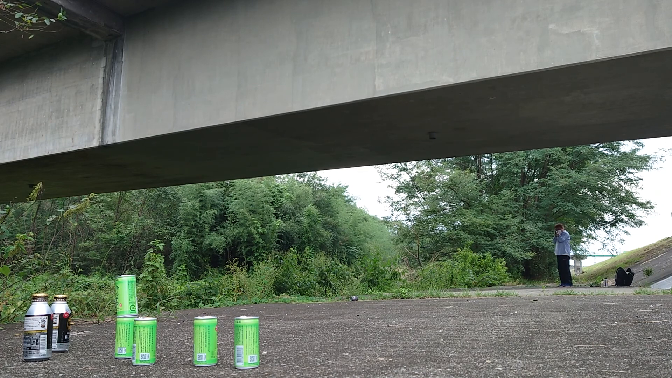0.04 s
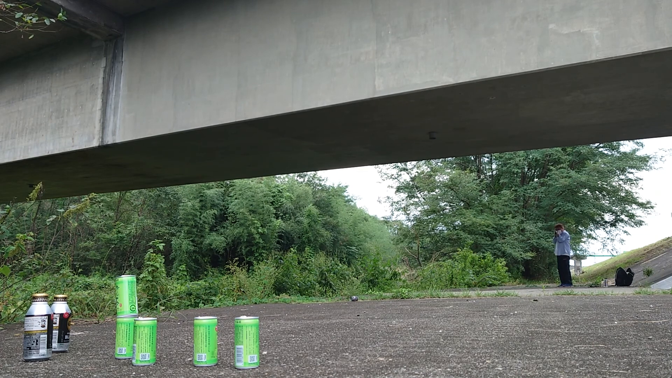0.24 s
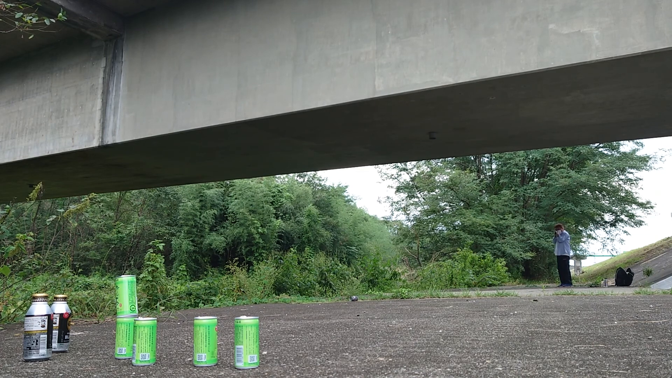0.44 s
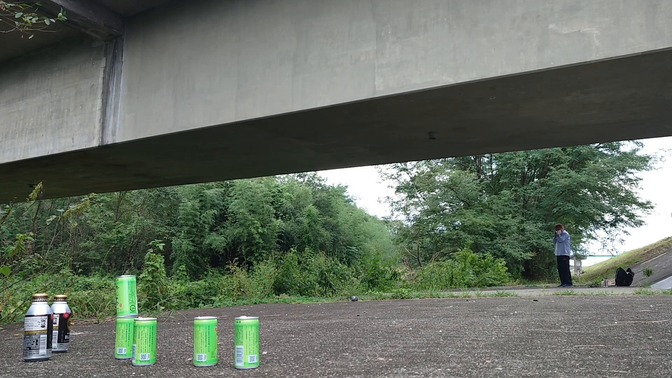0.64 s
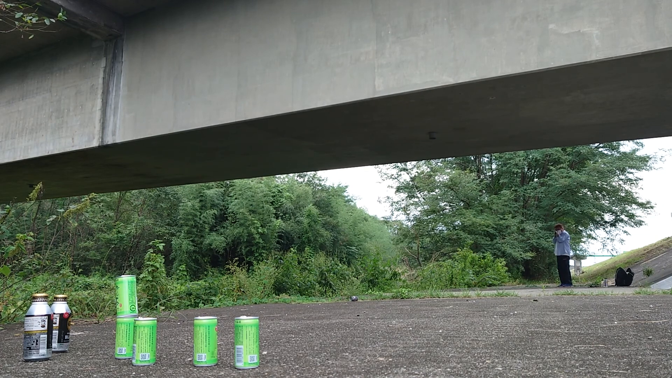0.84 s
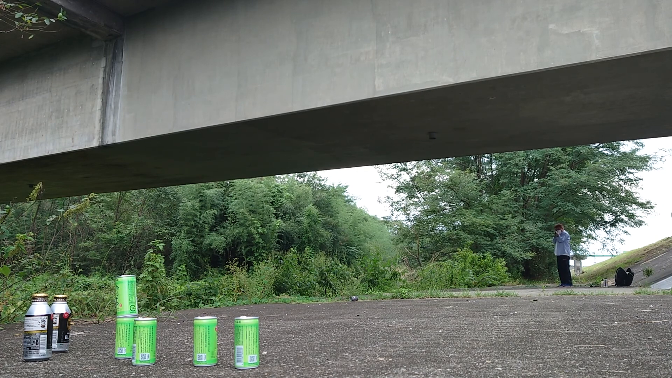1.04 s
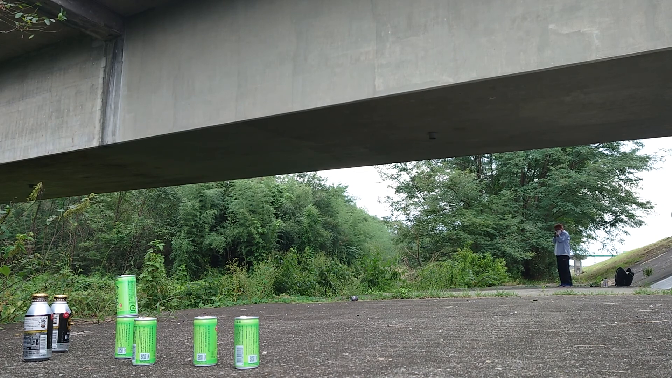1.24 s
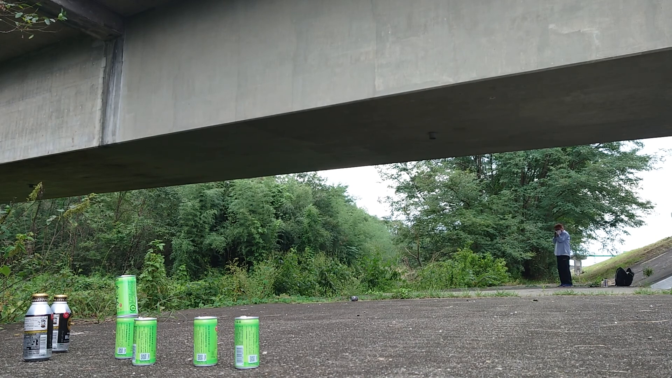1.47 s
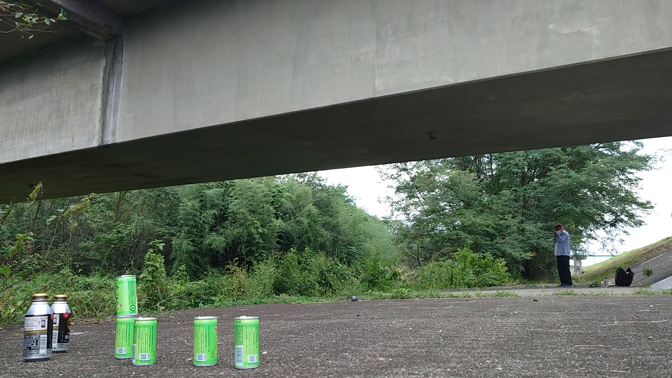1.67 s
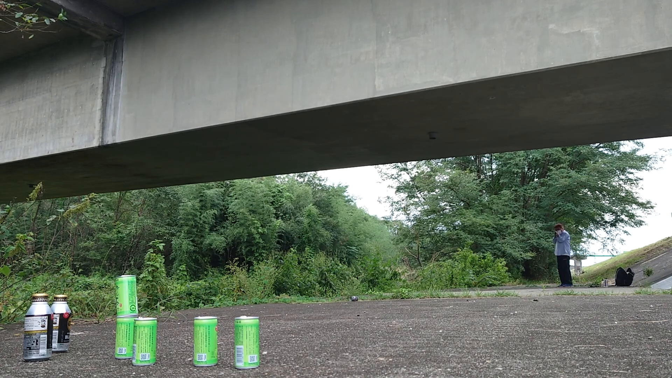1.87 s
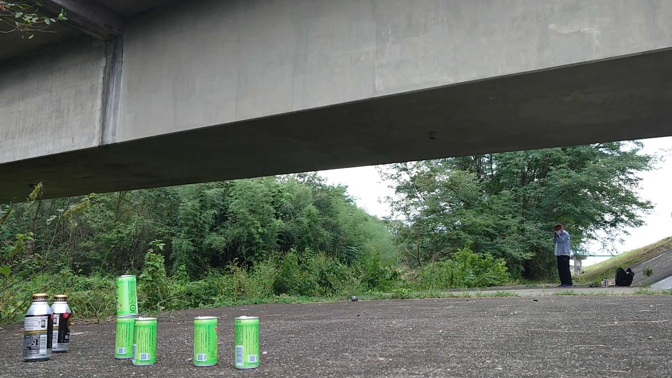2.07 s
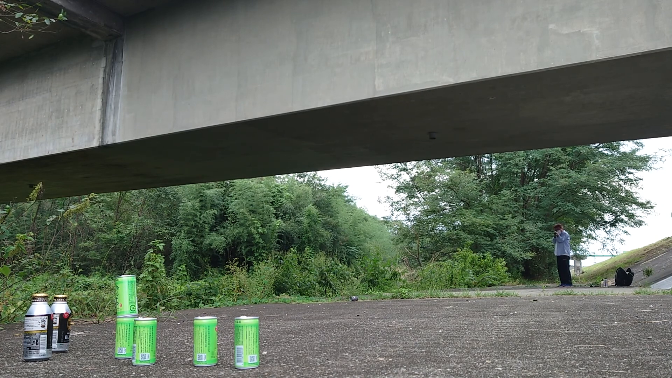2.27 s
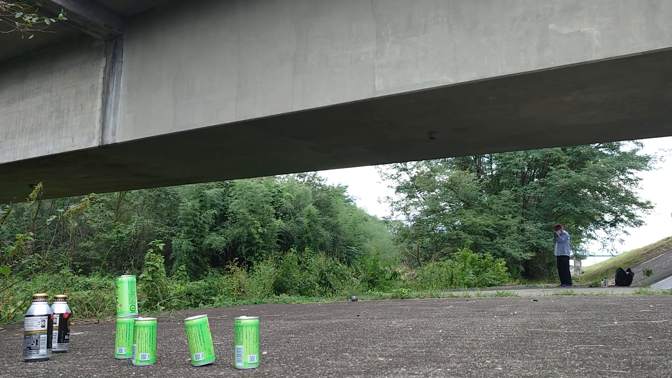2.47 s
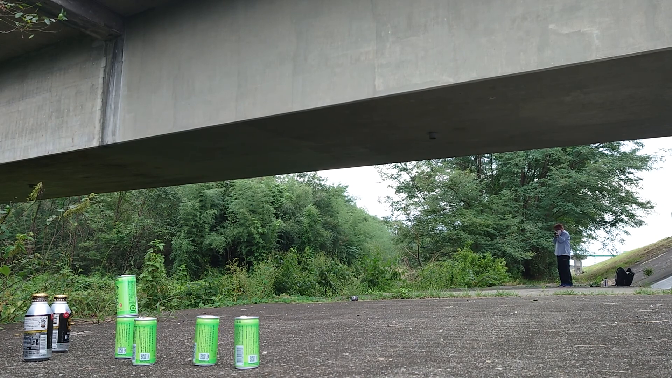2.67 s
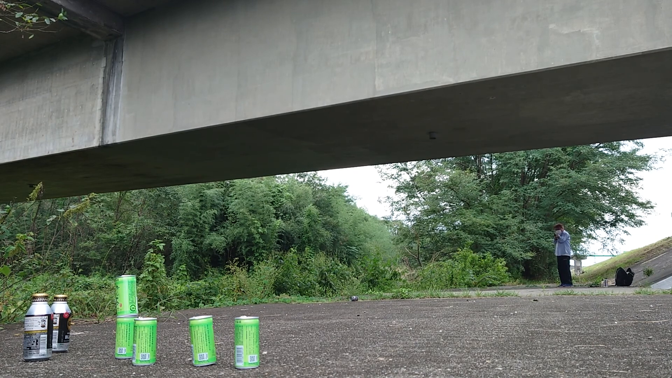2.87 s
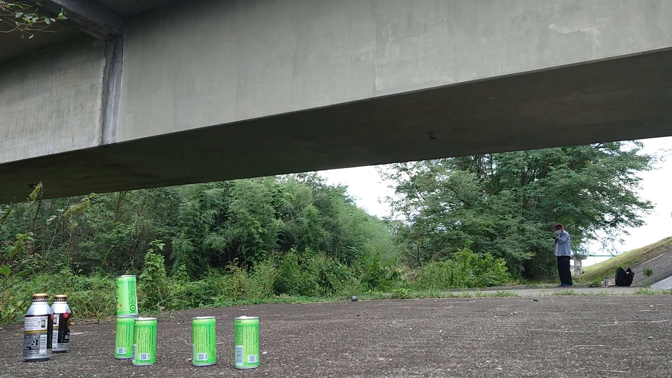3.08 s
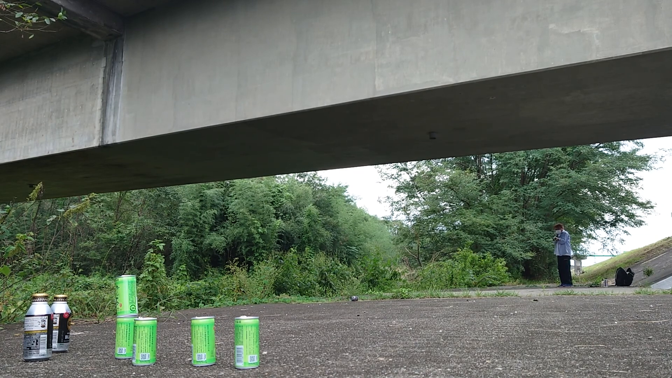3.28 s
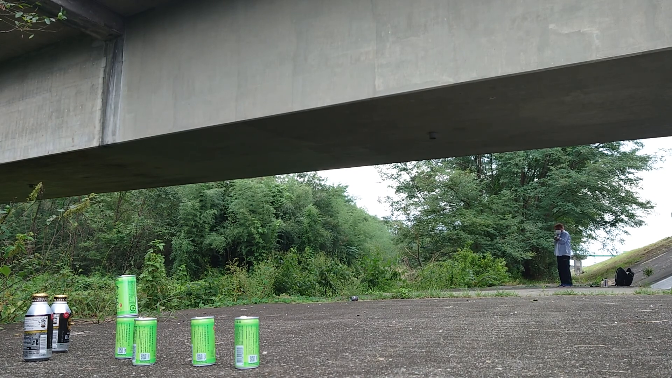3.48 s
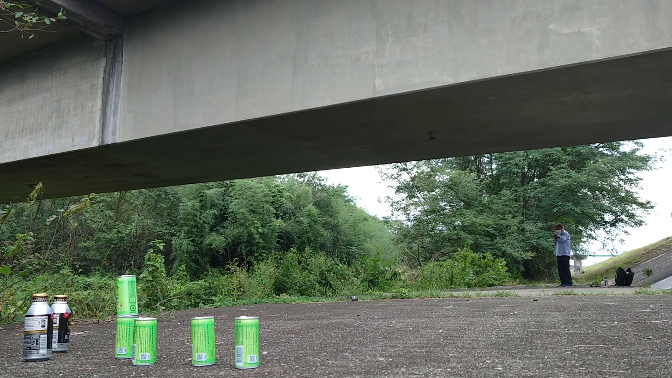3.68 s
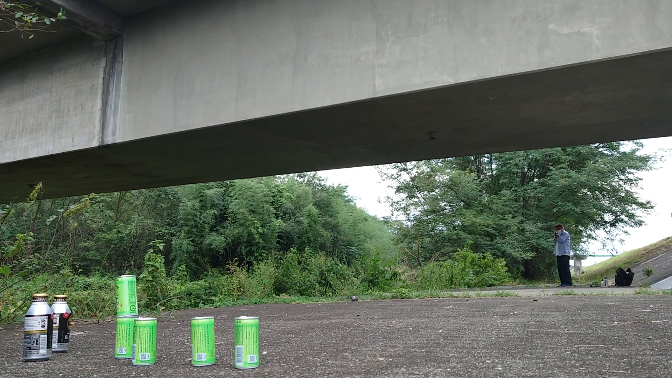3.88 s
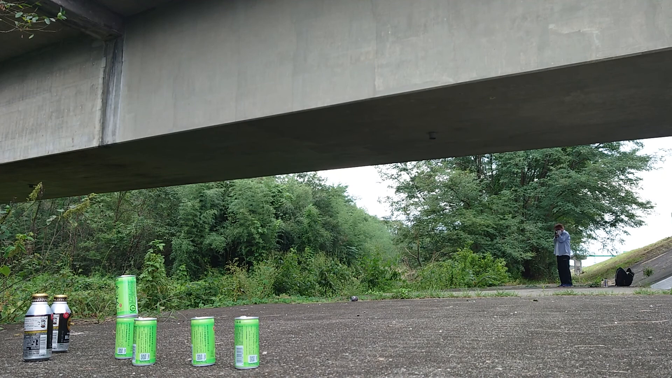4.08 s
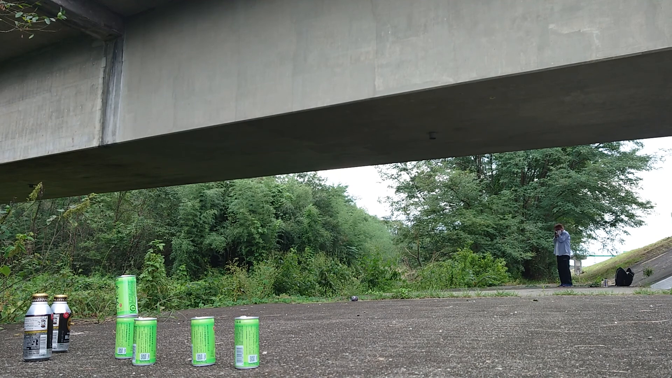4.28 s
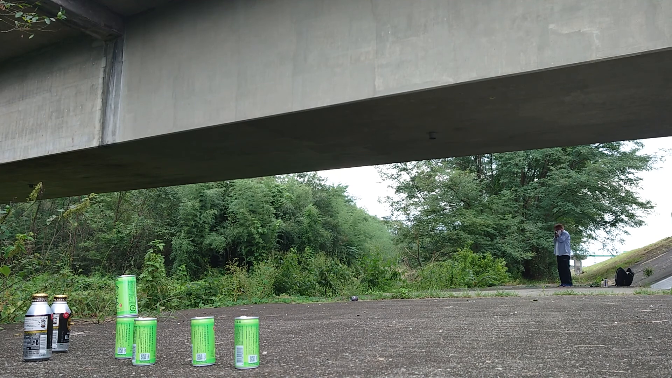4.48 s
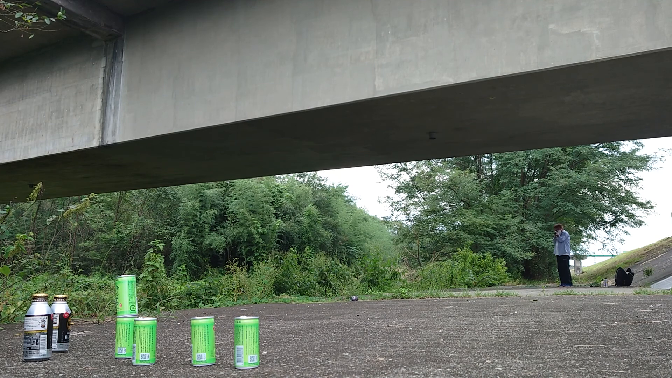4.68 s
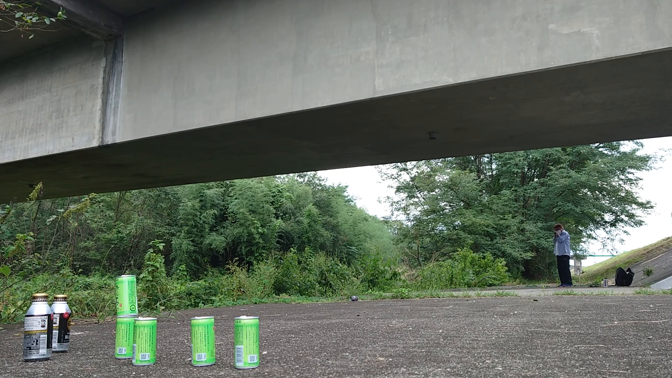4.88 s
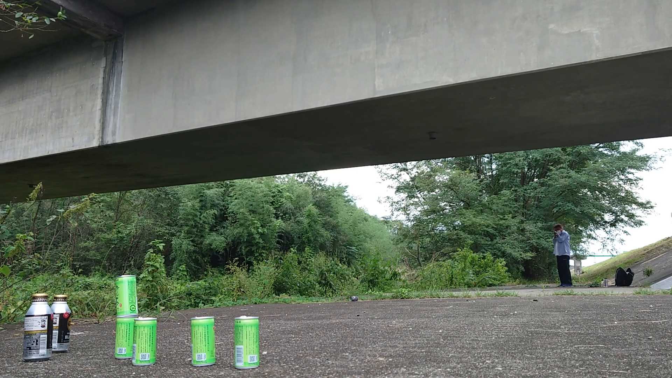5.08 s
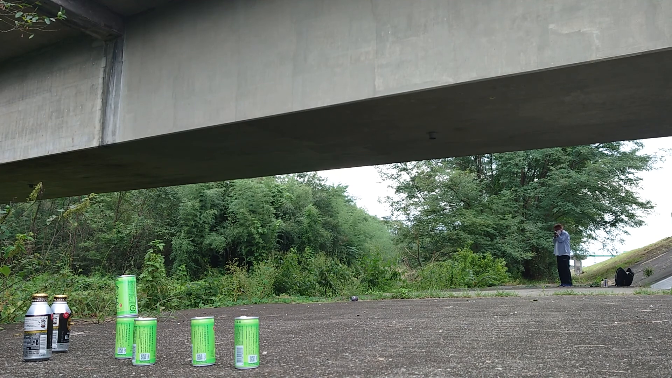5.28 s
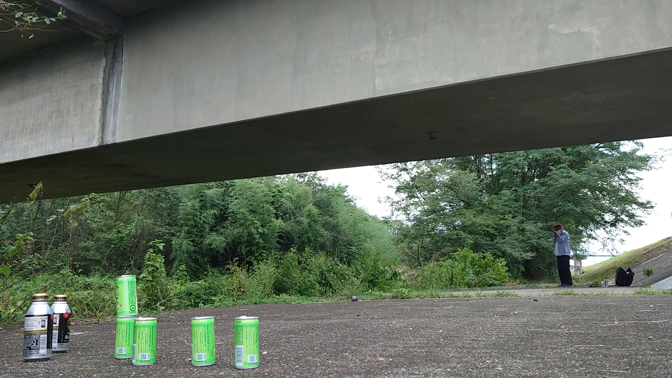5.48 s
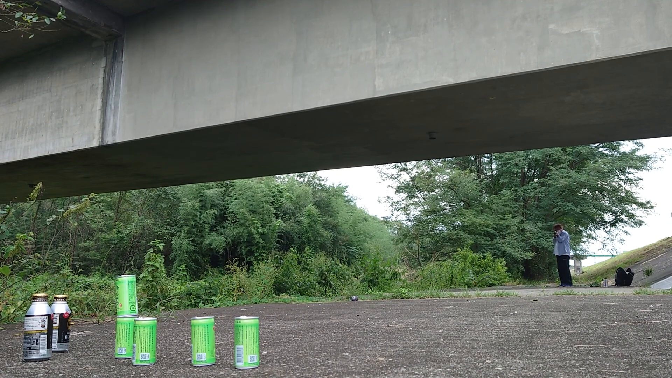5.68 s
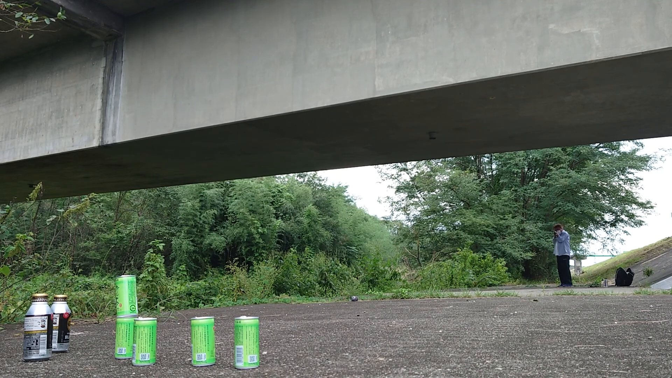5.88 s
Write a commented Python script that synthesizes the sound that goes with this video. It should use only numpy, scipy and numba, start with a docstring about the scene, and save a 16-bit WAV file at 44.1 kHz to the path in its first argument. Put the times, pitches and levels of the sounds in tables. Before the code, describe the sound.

Outdoors under a concrete bridge, low traffic drones with uneven booming swells and faint bird chirps. A short hollow pop is followed almost at once by a loud, bright smack on an empty aluminium can close to the microphones. It rings, drops onto asphalt and rocks with quickening, duller knocks. Dry ticks crackle at right; a softer pop follows, then sparse ticks and chirps.

```python
"""Traffic drones over a concrete bridge and birds chirp; dry ticks begin to crackle, far to the right.
An air gun pops some way off: a brief air pulse rings its barrel and body. The pellet then strikes an empty
drink can, whose modes ring; it tips, lands and rocks to rest on asphalt, its rim knocking at the same modes.
A second, softer pop follows; near the end a soft low swell passes among the last chirps and ticks.
The traffic is bands of noise, over hiss; filtered noise bursts make the ticks, gliding tones the birds."""
import sys
import numpy as np
from scipy import signal
from scipy.fft import rfft, irfft
from scipy.io import wavfile
from scipy.ndimage import uniform_filter1d, minimum_filter1d
from numba import njit

SR = 44100
rng = np.random.default_rng(int(sys.argv[2]) if len(sys.argv) > 2 else 0)


def to_wav(s):
    """Save 16-bit WAV."""
    ch = np.atleast_2d(s).T  # columns
    pcm = np.round(np.clip(ch, -1, 1) * 32767)  # PCM
    wavfile.write(sys.argv[1], SR, pcm.astype(np.int16))


N = 261513

# rim knocks as the can rocks: t/s, level at 1 kHz before each mode's share/dB, hardness/dB per octave
KNOCKS = [(2.735, -24, 3.5), (2.756, -19.5, 1), (2.896, -31.5, 1.5), (2.986, -45, 3), (3.033, -44.5, 0),
          (3.056, -31.5, -1.5), (3.117, -39.5, 0), (3.133, -33, -1.5), (3.182, -27.5, -1.5),
          (3.255, -30, -2.5), (3.311, -36.5, 3), (3.331, -52, 19.5)]
PELLET_S, PELLET_DB = 2.4852, -10


def undb(db):
    """dB to gain."""
    return 10 ** (np.asarray(db) / 20)


def band(x, hz, width_hz):
    """Resonant band-pass, gain 1 at the centre."""
    return signal.lfilter(*signal.iirpeak(min(hz, .45 * SR), hz / min(width_hz, .3 * SR), SR), x)


def steep_band(x, hz, width_hz):
    """The same band-pass twice over, for steeper skirts."""
    return band(band(x, hz, width_hz), hz, width_hz)


def unit(x):
    """Scale to rms 1."""
    return x / np.sqrt(np.mean(x ** 2))


def walk(rate):
    """Random levels held 1 / rate s and smoothed twice; spread near 1."""
    k = int(SR / rate)
    steps = np.repeat(rng.standard_normal(N // k + 1), k)
    return 1.11 * uniform_filter1d(uniform_filter1d(steps, k), k)[:N]


def add(track, s, burst):
    """Mix a burst into a track at time s."""
    i = int(s * SR)
    track[..., i:i + burst.shape[-1]] += burst[..., :N - i]


def place(x, pan_db, left_lag_ms):
    """Two spaced microphones: a level step and a time step."""
    turn = np.exp(-2j * np.pi * np.arange(N // 2 + 1) / N * SR * left_lag_ms / 1000)
    left = irfft(rfft(x) * turn, N)
    return np.array([left * undb(pan_db / 2), x * undb(-pan_db / 2)])


def fade(t, t60):
    """Exponential decay, 60 dB in t60."""
    return np.exp(-np.log(1000) * t / t60)


@njit
def ring(force, turn, keep):
    """One mode as a rotating, shrinking phasor whose loss may change from sample to sample."""
    z, y = 0j, np.empty(len(force))
    for i in range(len(force)):
        z = z * turn * keep[i] + force[i]
        y[i] = z.imag
    return y


def can_modes():
    """Pellet and ground drive the same modes; landing changes their damping, and knocks choke the old ring."""
    # pitch of each can mode: f/Hz
    mode_hz = [462, 505, 520, 780, 851, 1170, 1184, 1480, 1557, 1718, 1954, 2227, 2356, 2947, 3042, 3112,
               3180, 3210, 3295, 3406, 3505, 3725, 3782, 3938, 4409, 4660, 4764, 5060]
    # each mode in turn: share of pellet on wall/dB, share of rim on ground/dB, t60 tipped/s, t60 standing/s
    modes = [(-29, -26, 0.14, 0.48), (-34, -12, 0.46, 0.26), (-31, -19.5, .25, 0.12),
             (-47, -41, 0.17, 0.087), (-45, -15, .4, 0.19), (-39, -12, 0.62, 0.16), (-39, -5.5, 0.89, 0.29),
             (-26, -32, 0.39, 0.12), (-26, -31, 0.74, 0.071), (-27, -35, 0.95, 0.067),
             (-20.5, -11.5, 0.32, 0.067), (-25.5, -39, 0.75, .06), (-50, -18.5, .3, 0.34),
             (-5.5, -34, 0.15, 0.25), (-27, -38, 0.25, .2), (-18, -33, 0.14, 0.29), (7, -32, 0.034, .02),
             (0, -35, 0.092, .12), (-5, -40, 0.11, 0.23), (-19, -32, 0.18, 0.19), (-26, -33, 0.37, 0.33),
             (-40, -33, 0.42, 0.17), (-11, -37, 0.17, 0.095), (-19.5, -51, 0.43, 0.28),
             (-24, -50, 0.14, .2), (-9, -40, 0.13, 0.13), (-18, -37, 0.12, 0.17), (-33, -43, 0.11, .2)]
    lands_s, rests_s = 2.7355, 3.312
    rebound_db, rebound_ms = -9.5, (4, 12)  # the rim touches a second time after each knock
    s_now = np.arange(N) / SR
    where = rng.standard_normal((len(KNOCKS), len(modes)))  # each knock falls on another point of the rim
    gaps = rng.uniform(*rebound_ms, len(KNOCKS)) / 1000
    choke = np.ones(N)
    for s, *_ in KNOCKS[2:]:
        choke[int(s * SR) - 1] = 0.38
    choke[s_now > rests_s] = fade(1 / SR, .06)
    out = np.zeros(N)
    for m, (hz, (wall_db, rim_db, tipped, stands)) in enumerate(zip(mode_hz, modes)):
        force = np.full(N, 1e-18)
        add(force, PELLET_S, undb([PELLET_DB + wall_db]) * (-1) ** m)
        for (s, db, hard_db), w, gap in zip(KNOCKS, where[:, m], gaps):
            blow = undb([db + rim_db + hard_db * np.log2(hz / 1000) + 2.6 * w])
            add(force, s, blow)
            add(force, s + gap, blow * undb(rebound_db - 2.3 * w))
        damping = fade(1 / SR, np.where(s_now > lands_s, stands, tipped))
        out += ring(force, np.exp(2j * np.pi * hz / SR), choke * damping)
    return out


def can_crash():
    """The countless close modes of the thin wall blur into a crash and a sizzle, as decaying bands of noise."""
    out, t = np.zeros(N), np.arange(SR // 4) / SR
    # f/Hz, width/Hz, level/dB, quick t60/s, level of the slow part/dB, slow t60/s
    for hz, width_hz, db, quick, slow_db, slow in [
            (3360, 2100, 8.0, .07, -21, 0.13), (4550, 3600, 0.5, 0.063, -14.5, 0.29),
            (8800, 5000, -3.0, 0.059, -18, 0.15), (12700, 7800, -1, 0.049, -21, 0.22)]:
        blur = steep_band(rng.standard_normal(len(t)), hz, width_hz)
        decay = fade(t, quick) + undb(slow_db) * fade(t, slow)
        onset = np.clip(t / 0.00062, 0, 1)
        add(out, PELLET_S, undb(PELLET_DB + db) * blur * decay * onset)
    return out


def rim_scrape():
    """The dull scrape of rim on grit: two bands of decaying noise at each knock."""
    out, t = np.zeros(N), np.arange(2000) / SR
    for s, db, hard_db in KNOCKS:
        grit = rng.standard_normal(len(t)) * fade(t, 0.03)
        for hz, width_hz, share_db in [(790, 510, 7.3), (2040, 1100, 0.67)]:
            level_db = db + share_db + hard_db * np.log2(hz / 1000)
            add(out, s, undb(level_db) * steep_band(grit, hz, width_hz))
    return out


def can():
    """The ringing modes with a bent octave, the crash of the thin wall and the scrape of the rim."""
    tin = can_modes()
    # the dented wall bends unevenly, so the strongest ring doubles to its octave when it is loud
    octave = steep_band(band(tin, 1200, 300) ** 2, 2330, 190)
    return tin + undb(16) * octave + can_crash() + rim_scrape()


def pops():
    """A burst of air as a short falling pulse that rings barrel and body, echoed at once by ground and piers."""
    # gun pops: t/s, level/dB, echo send over direct level/dB, relative strength of the body thump/dB
    shots = [(2.2771, -14, -7.5, -3.5), (3.759, -25.5, -6.5, -9)]
    # resonances of barrel and body: f/Hz, width/Hz, relative level/dB
    gun_body = [(295, 82, -2), (785, 100, 1.5), (1105, 160, 1.5), (2200, 1200, -2.5), (4170, 1070, -7)]
    dry, sent, t = np.zeros(N), np.zeros(N), np.arange(2000) / SR
    pulse = np.where(t < .0004, 1 - 2 * t / 0.00062, 0)
    arrivals = [(1.3, 0.61), (1.8, 0.84), (3.9, 0.59), (6.3, 0.62), (8.6, 0.34)]  # lag/ms, gain
    train = sum(gain * np.roll(pulse, int(lag_ms * SR / 1000)) for lag_ms, gain in arrivals)
    for s, db, echo_db, thump_db in shots:
        rattle = rng.standard_normal(len(t)) * fade(t, 0.071) * np.clip(t / 0.0039, 0, 1) ** 2
        push = np.abs(train) + 0.19 * rattle
        body = sum(undb(d) * band(push, hz, width_hz) for hz, width_hz, d in gun_body)
        pop = undb(-6.0) * train + undb(-13.5) * rattle + undb(thump_db + 14.5) * body
        add(dry, s, undb(db) * pop)
        add(sent, s, undb(db + echo_db) * pop)
    return dry, sent


def ticks():
    """Bright clicks far to the right: short noise swells with grains of uneven size, each with a faint rustle."""
    # the clearer ticks: t/s, level before the split to the sides/dB, length scale/ms, centre f/Hz
    clear = [(2.101, -62, 2.5, 11000), (2.4601, -37, 1.8, 11000), (2.478, -63, 1, 11000),
             (2.829, -43, 1.6, 10200), (2.884, -52, 2, 10000), (2.898, -53, 3.4, 8000),
             (3.199, -50.5, 2.1, 8500), (3.2152, -43.5, 3.8, 8850), (3.313, -54, 15, 4000),
             (3.3333, -50, 17, 8000), (3.4505, -46, 5.4, 6100), (3.489, -54.5, 3.4, 11000),
             (3.592, -58, 2, 8400), (3.609, -55.5, 3, 8800), (3.677, -52, 12, 8700),
             (3.693, -44.5, 4.7, 8700), (3.787, -49, 4.4, 8500), (3.803, -48.5, 3.8, 8400),
             (4.037, -57, 4.8, 9800), (4.238, -58, 2, 10000), (4.681, -60, 1.5, 9500),
             (4.783, -53.5, 4.5, 9500), (5.175, -56.5, 2, 11000), (5.283, -59, 2.8, 11000),
             (5.72, -57, 3.7, 11000), (5.734, -51.5, 9.2, 10900), (5.772, -51, 2, 10500)]
    faint_count, faint_from_s = 10, 2.8  # faint ticks fall at random from then on
    faint_db, faint_spread_db, faint_ms, faint_hz = -61.5, 0.5, 2.2, 11500
    rise = 0.27  # share of a tick's length
    side_db = np.array([[-11], [3]])  # left, right
    out, t = np.zeros((2, N)), np.arange(5000) / SR
    faint = [(faint_from_s + u * (N / SR - faint_from_s), faint_db + faint_spread_db * (2 * v - 1),
              faint_ms, faint_hz) for u, v in rng.random((faint_count, 2))]
    for s, db, ms, hz in clear + faint:
        grains = undb(5.9 * rng.standard_normal(len(t) // 20 + 1)).repeat(20)[:len(t)]
        noise = rng.standard_normal((4, len(t)))
        age = t / ms * 1e3  # in tick lengths
        swell = np.exp(-np.minimum(age ** 2, 20)) * np.clip(age / rise, 0, 1)
        burst = band(noise[:2] * grains * swell, hz, 5900)
        # level by the energy on the right, spread over at least 4 ms
        burst = burst / np.sqrt(np.sum(burst[1] ** 2) / (max(ms, 4) * SR / 1000))
        rustle = undb(-10) * band(noise[2:], hz, 9000) * fade(t, 0.47)
        add(out, s, undb(db + side_db) * (burst + rustle))
    return signal.sosfilt(signal.butter(2, 3000, "high", fs=SR, output="sos"), out + 1e-12)


def birds():
    """Near-sine slurs that glide through a top or straight down and flutter a little in level and pitch."""
    # chirps: start t/s, top t/s, end t/s, start f/Hz, top f/Hz, end f/Hz, power of the fall,
    # level at the top before flutter/dB
    chirps = [(.063, .112, .168, 2200, 3270, 1900, 1.4, -63),
              (1.648, 1.65, 1.672, 6500, 6500, 4500, .6, -72),
              (1.815, 1.82, 1.858, 7050, 7100, 5600, 2.2, -67),
              (3.115, 3.12, 3.158, 7150, 7220, 5600, 2.2, -65),
              (5.055, 5.06, 5.13, 3150, 3150, 3050, 1, -75),
              (5.134, 5.197, 5.232, 2040, 3820, 1950, .95, -55),
              (5.216, 5.22, 5.272, 5250, 5250, 3950, .7, -69)]
    ends_db, rise_bend = -3, 2.6  # level at both ends under the top, power of the rise
    flutter_db, wobble = 3, .015  # spread of the level, spread of the pitch as a share
    out = np.zeros(N)
    for start, top, end, start_hz, top_hz, end_hz, fall_bend, db in chirps:
        t = np.arange(start, end, 1 / SR)
        before = np.clip((top - t) / (top - start), 0, 1)
        after = np.clip((t - top) / (end - top), 0, 1)
        hz = top_hz - (top_hz - start_hz) * before ** rise_bend - (top_hz - end_hz) * after ** fall_bend
        phase = 2 * np.pi * np.cumsum(hz * (1 + wobble * walk(91)[:len(t)])) / SR
        tone = np.sin(phase) * signal.windows.tukey(len(t), .2)
        level_db = db + ends_db * (before + after) + flutter_db * walk(123)[:len(t)]
        add(out, start, np.sqrt(2) * undb(level_db) * tone)
    return out


def thud():
    """A soft dull swell of low noise under a bell-shaped envelope."""
    peak_s, length_s, hz, width_hz, db = 5.25, 0.052, 460, 210, -51
    noise = steep_band(rng.standard_normal(N), hz, width_hz)
    return unit(noise) * undb(db) * np.exp(-((np.arange(N) / SR - peak_s) / length_s) ** 2)


def bridge(x):
    """Dense echoes from deck and piers: noise with one decay per band, swelling in over the first 4.3 ms."""
    # decay of each echo band: f/Hz, t60/s
    echo_bands = [(300, 0.37), (2500, 0.64), (9000, 0.83)]
    t = np.arange(int(.7 * SR)) / SR
    tail = sum(band(rng.standard_normal((2, len(t))), hz, 0.91 * hz) * fade(t, t60) for hz, t60 in echo_bands)
    tail = tail * np.clip(t / 0.0043, 0, 1) / np.sqrt(np.sum(tail ** 2) / 2)
    return signal.fftconvolve(x[None], tail, axes=1)[:, :N]


def traffic():
    """Noise bands, each flickering by itself, whose shared part reaches the left microphone first."""
    # rumble bands: f/Hz, nominal width/Hz, level over the layer/dB, likeness left-right (0-1),
    # left minus right/dB, layer (0 boom, 1 drone, 2 wash, 3 whine)
    rumble = [(35, 39, -9.5, 0.32, 4, 0), (80.4, 28.2, 3, 0.98, 6, 0), (119.3, 56.4, 0.5, 0.93, -1.5, 1),
              (189, 66, -11.5, 1, -3.5, 1), (306, 230, -4.5, 1, -1, 2), (519, 297, -0.5, 0.9, 0.5, 2),
              (772, 430, -4.5, 0.7, 0, 2), (1263, 250, -17.5, 0.69, -2, 2), (1700, 296, 1.5, 0.74, 2.5, 3),
              (2126, 400, -4.5, 0, -3, 3), (3040, 680, -20, 0.0014, -12, 3)]
    # swings of the deck boom: t/s, layer level/dB
    boom_swings = [(0, -48), (.16, -42.5), (.46, -53), (.6, -41.5), (.9, -51), (1.22, -45), (1.42, -57),
                   (1.57, -44), (1.85, -55), (2.15, -48), (3.1, -48.5), (3.29, -57), (3.38, -42.5),
                   (3.55, -54.5), (3.71, -47.5), (3.85, -59), (3.97, -43), (4.18, -55.5), (4.53, -48),
                   (4.67, -56), (4.9, -45.5), (5.36, -54.5), (5.45, -45.5), (5.93, -47)]
    # engine drone, road wash, tyre whine die away as the vehicles leave: layer level at 0 s/dB, slope/dB per s
    leaving = [(-44, -1.21), (-55, -.5), (-62.5, -2.5)]
    drone_follows = 0.15  # share of the boom's swings in the drone
    t = np.arange(N) / SR
    boom = np.interp(t, *np.transpose(boom_swings))
    drone, wash, whine = (db + slope_db * t for db, slope_db in leaving)
    layers = boom, drone + drone_follows * (boom - boom.mean()), wash, whine
    out = 0
    for hz, width_hz, db, like, pan_db, layer in rumble:
        shared, left, right = (unit(steep_band(rng.standard_normal(N), hz, 1.32 * width_hz)) for _ in range(3))
        like = np.clip(like, 0, 1)
        pair = np.sqrt(like) * place(shared, 0, -0.37) + np.sqrt(1 - like) * np.array([left, right])
        flicker_db = 1.94 * walk(9)
        side_db = np.array([[pan_db / 2], [-pan_db / 2]])
        out = out + pair * undb(db + layers[layer] + flicker_db + side_db)
    return out


def hiss():
    """Bands of hiss, unrelated on each side, that drift gently in level on both sides together."""
    # hiss in the treble: f/Hz, nominal width/Hz, left level before drift/dB, right level before drift/dB
    hiss_bands = [(4265, 780, -61, -59.5), (6600, 1800, -99, -93), (7725, 970, -77, -59.5),
                  (11000, 7900, -89, -92), (14700, 4700, -75, -74)]
    out = 0
    for hz, width_hz, *db in hiss_bands:
        noise = steep_band(rng.standard_normal((2, N)), hz, 0.96 * width_hz)
        out = out + unit(noise) * undb(np.array(db)[:, None] + 0.85 * walk(5.06))
    return out


def colour(x):
    """The right port lifts its resonance; the left one faces away and loses treble."""
    # resonance of the right microphone port: f/Hz, width/Hz, level of the added band/dB
    hz, width_hz, db = (8100, 1100, 3.9)
    dull = signal.lfilter(*signal.butter(1, 9000, fs=SR), x[0])
    return np.array([dull, x[1] + undb(db) * band(x[1], hz, width_hz)])


def scene():
    """Place every source; can, pops and birds also send a share to the bridge echo."""
    tin, (pop, pop_sent), song = can(), pops(), birds()
    near = place(tin, -0.72, -0.09) + place(pop, -3, 0.21) + place(song, -9.5, -0.25)
    near = near + ticks() + thud()
    wet = bridge(undb(-12.5) * tin + pop_sent + undb(-3.5) * song)
    return colour(near + wet) + traffic() + hiss()


def record(dry):
    """A look-ahead limiter holds its gain after a loud peak, cutting the bass hardest; then the top is cut."""
    threshold_db, top_hz = -13, 16000
    loud = np.sqrt(uniform_filter1d(np.max(dry ** 2, axis=0), size=220).clip(1e-12))
    need = np.minimum(1, undb(threshold_db) / loud)
    ahead, hold = int(.007 * SR), int(.16 * SR)
    held = minimum_filter1d(need, hold + ahead, origin=(hold - ahead) // 2 - 1)
    gain = uniform_filter1d(held, int(0.0073 * SR))
    bass = signal.sosfiltfilt(signal.butter(1, 400, fs=SR, output="sos"), dry)
    limited = (dry - bass) * gain + bass * np.abs(gain) ** 4.9
    return signal.sosfilt(signal.ellip(10, .2, 80, top_hz, fs=SR, output="sos"), limited)


dry = scene()
out = record(dry)
to_wav(out)
```